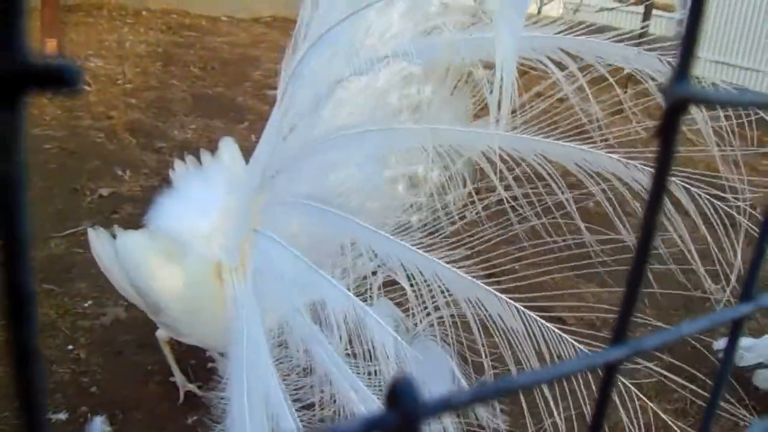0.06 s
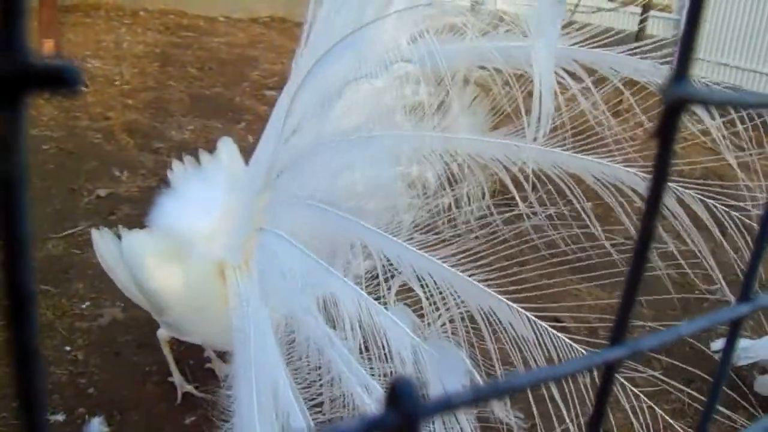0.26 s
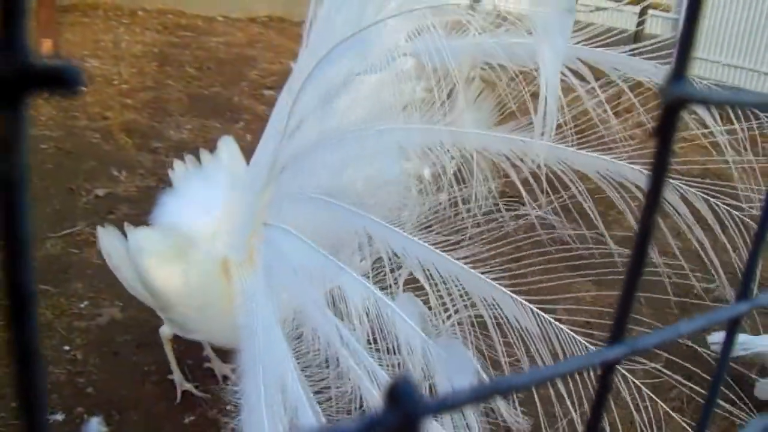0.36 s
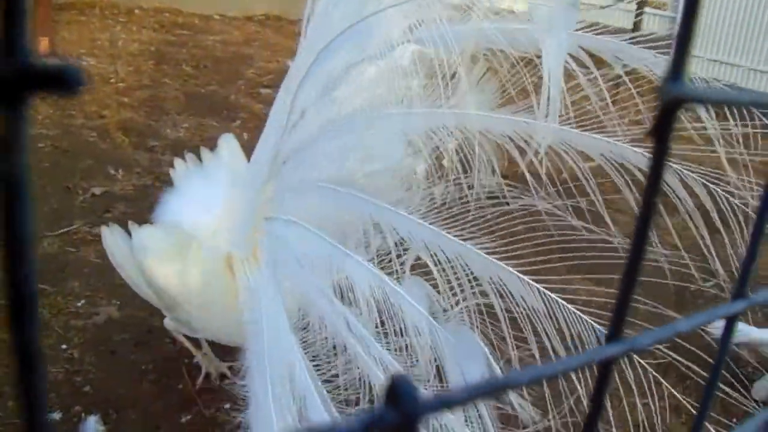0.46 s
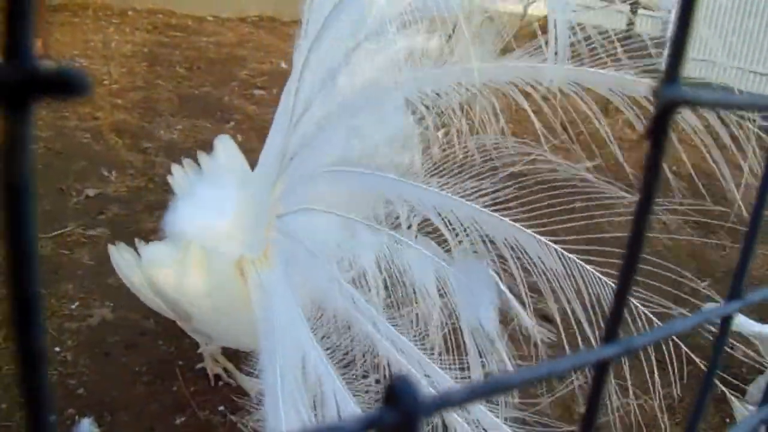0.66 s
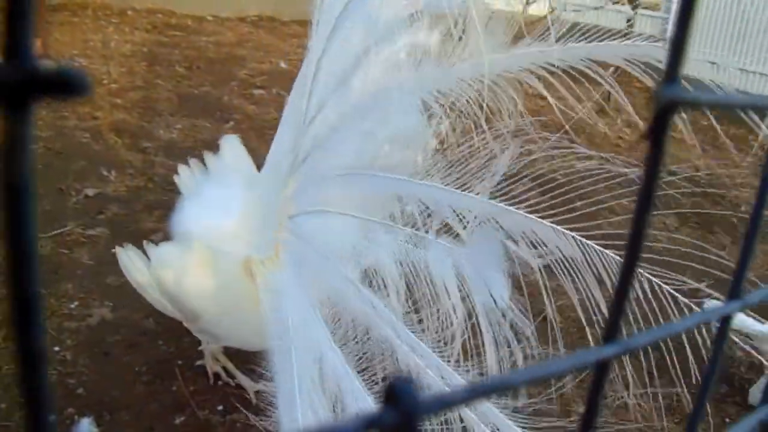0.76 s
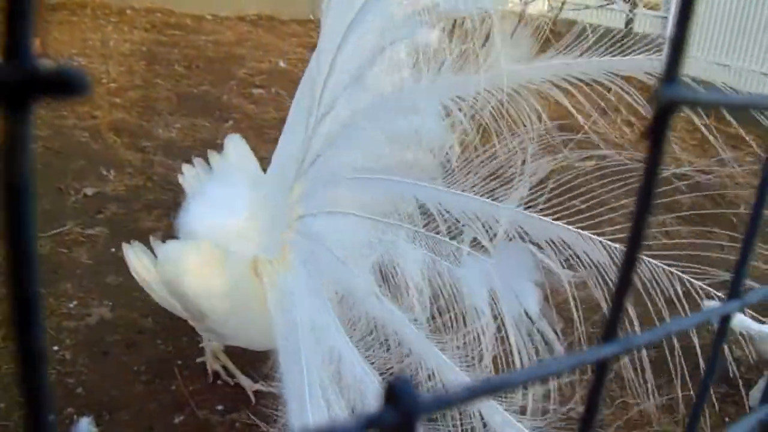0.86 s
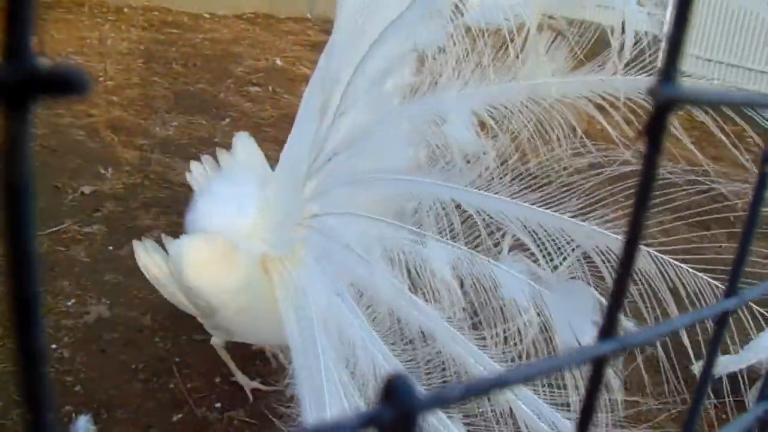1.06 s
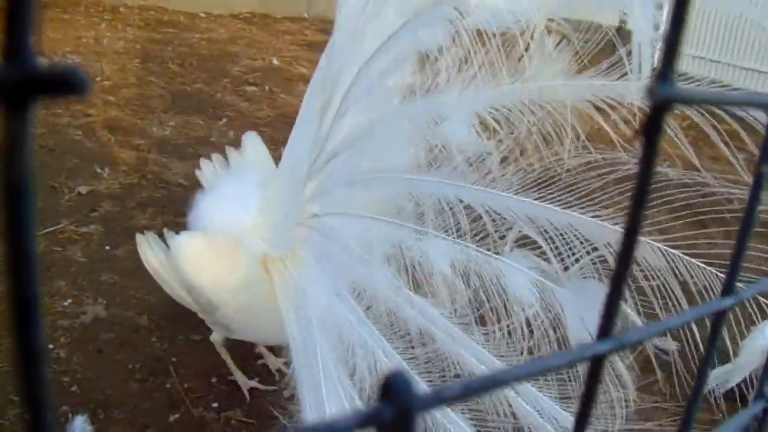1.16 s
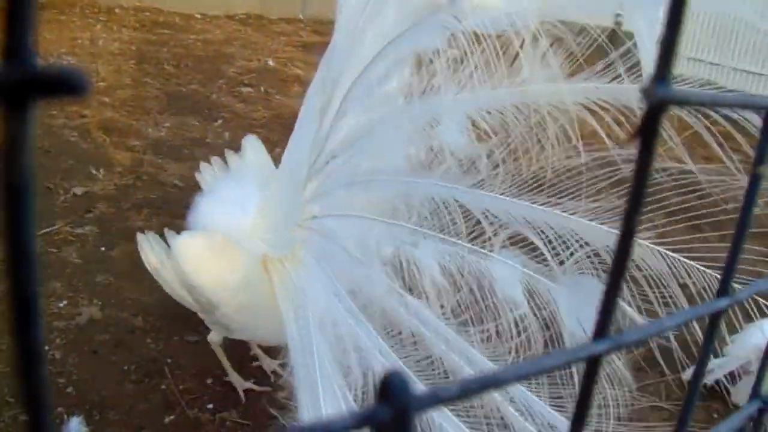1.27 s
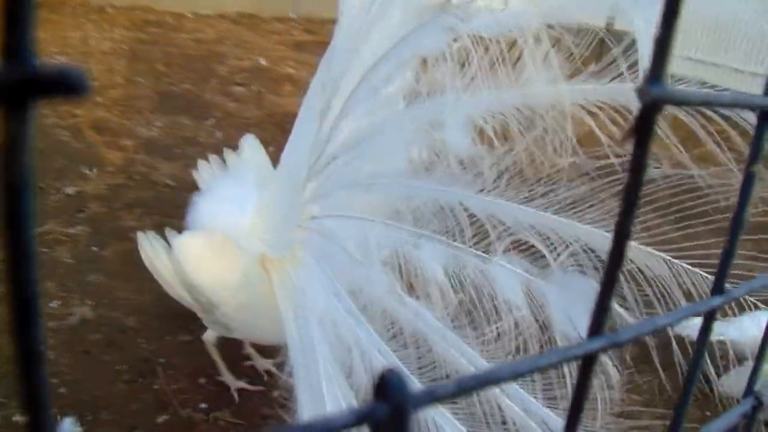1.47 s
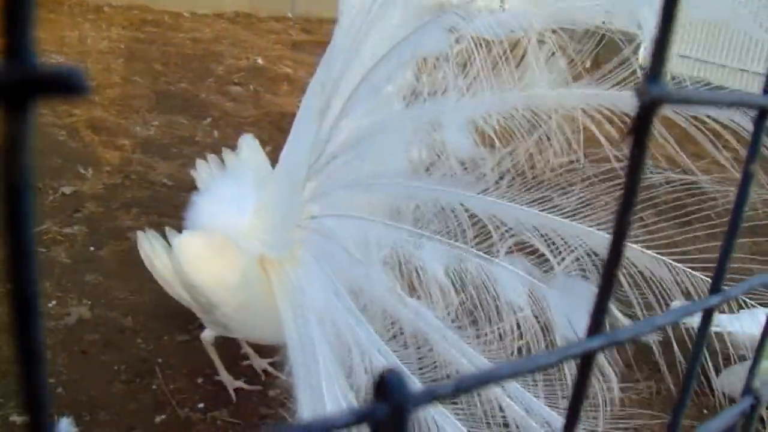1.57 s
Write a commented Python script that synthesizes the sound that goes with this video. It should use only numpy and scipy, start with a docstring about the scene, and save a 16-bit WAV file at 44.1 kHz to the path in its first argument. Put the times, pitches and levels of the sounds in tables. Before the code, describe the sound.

Harsh bird calls, probably parrots, echo in an aviary: a hoarse growl swells into a loud squawk, then two shrill screeches follow. Close to the microphone, a peacock shivers its train in soft pats, and something ticks once.

```python
"""In an echoing aviary, birds, probably parrots, call: a hoarse growl swells into a loud squawk and two
shrill screeches follow, the first level, the second rising, with softer calls before and after.
The calls are harmonics and noise shaped by the throat's resonances. Close by, a displaying peacock
shivers its train in a run of soft pats, and something gives one sharp tick.
A low hum and faint hiss lie underneath."""
import sys
import numpy as np
from scipy import signal
from scipy.fft import rfft, irfft, next_fast_len
from scipy.io import wavfile
from scipy.ndimage import uniform_filter1d

SR = 44100
rng = np.random.default_rng(int(sys.argv[2]) if len(sys.argv) > 2 else 0)


def transcribe(u):
    """Save the signal u as a 16-bit wav file named by the first command-line argument.

    u: samples, shape (n,) or (channels, n), limited to [-1, 1]; the rate is SR.
    q: integer samples, one column per channel.
    """
    v = np.clip(np.atleast_2d(u).T, -1, 1)
    q = np.round(v * 32767).astype(np.int16)
    wavfile.write(sys.argv[1], SR, q)


N = 70560
LEAD = SR // 5  # samples before t = 0, so that the echo has already built up
TIME = np.arange(-LEAD, N) / SR


# Contour of the squawk: t/s, f/Hz, level/dB (levels in all tables are relative)
SQUAWK = [(.412, 850.4, -30), (.435, 944.7, -17), (.465, 984.9, -16), (.495, 892.8, -15),
          (.525, 905.8, -16.5), (.55, 837.7, -18), (.6, 820, -20), (.65, 820.4, -22.5), (.7, 809, -31)]
# Throat response: f/Hz, level/dB
SQUAWK_THROAT = [(150, -51), (250, -38.5), (407, -38), (543, -19), (710, -31), (1050, -7), (1540, -0.5),
                 (1680, -6), (2160, -6.5), (2690, -9.5), (2920, -8.5), (3700, -8.5), (4850, -13.5),
                 (5540, -15), (7510, -26), (10200, -26.5), (14000, -33)]
# Treble gain as the beak opens: t/s, level/dB
BEAK_TREBLE = [(.41, -4), (.47, -2.5), (.53, -2.5), (.58, 0.5), (.7, 2)]

def squawk(crossover_hz=2460):
    """Time-varying filtering: the loudest call brightens as the beak opens."""
    voice = call(SQUAWK, SQUAWK_THROAT, "squawk")
    body = signal.sosfiltfilt(signal.butter(2, crossover_hz, fs=SR, output="sos"), voice)
    treble = voice - body
    return body + treble * from_db(np.interp(TIME, *np.transpose(BEAK_TREBLE)))


# Contour of the growl: t/s, f/Hz, level/dB
GROWL = [(.185, 640, -36.5), (.225, 680, -28), (.275, 700, -25.5), (.35, 720, -26), (.415, 760, -23)]
# Throat response: f/Hz, level/dB
GROWL_THROAT = [(180, -68), (300, -26.5), (336, -43), (434, -27.5), (589, -34), (649, -20), (1320, -4),
                (1820, -3.5), (2470, -10), (3930, -13.5), (4260, -17.5), (6470, -23), (14000, -43)]

def growl():
    """Aperiodic excitation: a voice that is nearly all noise sounds hoarse."""
    return call(GROWL, GROWL_THROAT, "growl")


# Noise share of each voice's power (0-1)
RASP = dict(opening=.5, soft=.6, growl=0.95, squawk=0.76, low=.5, closing=0.46)
# Pitch jitter of each voice, as a fraction of the fundamental
JITTER = dict(opening=0.014, soft=0.014, growl=0.061, squawk=0.0304, first=.012, second=0.0116, low=0.0305, closing=0.019)

def call(contour, throat, name):
    """Source-filter principle: the throat colours harmonics and noise pulsed once per cycle."""
    hz, phase, envelope = modulation(contour, JITTER[name], throb_db=1.2)
    tone = sum(from_db(at_hz(throat, k * hz)) * np.sin(k * phase + rng.uniform(0, 2 * np.pi))
               for k in range(1, 19))
    tone /= np.sqrt(uniform_filter1d(tone ** 2, size=600) + 1e-12)  # hold at unit power
    rasp = unit_rms(coloured(noise() * (1 + np.cos(phase)), throat))
    return envelope * (np.sqrt(1 - RASP[name]) * tone + np.sqrt(RASP[name]) * rasp)


def modulation(contour, jitter, throb_db, edge_s=0.008):
    """Frequency and amplitude modulation: a voice jitters and throbs about its contour."""
    times, pitches, levels = np.transpose(contour)
    hz = np.interp(TIME, times, pitches)
    phase = 2 * np.pi * np.cumsum(hz * (1 + jitter * drift(350))) / SR
    gate = np.clip(np.minimum(TIME - times[0], times[-1] - TIME) / edge_s + 1, 0, 1)
    envelope = gate * from_db(np.interp(TIME, times, levels) + throb_db * drift(70))
    return hz, phase, envelope


# Contours of the screeches: t/s, f/Hz, level/dB
FIRST_SCREECH = [(.808, 762.4, -39), (.838, 747, -33), (.872, 776, -26.5), (.91, 769, -30), (.96, 753, -31),
                 (.985, 743, -44)]
SECOND_SCREECH = [(1.086, 669.3, -36), (1.1, 697, -33), (1.108, 752.6, -31), (1.122, 824, -29),
                  (1.15, 844, -28), (1.185, 855, -23), (1.215, 855.4, -35), (1.236, 856, -20),
                  (1.248, 850, -33)]
# Their line spectra: harmonic number, level/dB
FIRST_OVERTONES = [(2, -20), (4, -30), (5, -7), (6, -0.5), (7, -4), (8, -10.5), (10, -19), (12, -14),
                   (15, -37), (18, -26)]
SECOND_OVERTONES = [(2, -19.5), (3, -21), (4, -20), (5, 0.5), (6, -1), (7, -15), (8, -19), (9, -18.5),
                    (10, -6.5), (11, -16.5), (12, -20.5), (14, -32), (15, -22.5), (17, -31)]

def screeches():
    """Missing fundamental: two shrill calls carry most of their power near the sixth harmonic."""
    return (screech(FIRST_SCREECH, FIRST_OVERTONES, JITTER["first"])
            + screech(SECOND_SCREECH, SECOND_OVERTONES, JITTER["second"]))


def screech(contour, overtones, jitter, rasp=0.22, wobble=0.01098, flicker_db=4.5):
    """Spectral broadening: random modulation frays each overtone into a narrow band of rasp."""
    hz, phase, envelope = modulation(contour, jitter, throb_db=2.4)
    phase += 2 * np.pi * np.cumsum(hz * wobble * drift(113.8)) / SR
    voice = 0
    for k in range(2, 19):
        fray = np.sqrt(1 - rasp) + np.sqrt(rasp / 2) * (drift(325) + 1j * drift(325))
        gain = from_db(np.interp(k, *np.transpose(overtones)) + flicker_db * drift(70))
        carrier = np.exp(1j * (k * phase + rng.uniform(0, 2 * np.pi)))
        voice += gain * np.real(fray * carrier)
    return envelope * unit_rms(voice)


# Clear notes within the calls, one contour each: t/s, f/Hz, level/dB
WHISTLES = [
    [(0, 3360, -36.5), (.02, 3410, -37.5), (.05, 3390, -36), (.07, 3500, -61)],
    [(.14, 2730, -44), (.19, 2710, -33.5), (.22, 2656, -42)],
    [(.414, 1680, -19.5), (.433, 1886, -19), (.448, 1891, -29), (.465, 2058, -25), (.48, 1890, -21.5),
     (.495, 1783, -20.5), (.52, 1795, -17.5), (.54, 1776, -21), (.555, 1570, -26)],
    [(.812, 4640, -33), (.84, 4460, -28.5), (.875, 4633, -39), (.915, 4585, -30)],
    [(1.087, 3262, -39), (1.098, 3476, -33), (1.108, 3850, -47), (1.13, 3960, -47)],
    [(1.4135, 2130, -31.5), (1.424, 2090, -44.5), (1.436, 2140, -46)],
]

def whistles():
    """Nearly simple harmonic motion: each note is one gliding sinusoid."""
    notes = 0
    for contour in WHISTLES:
        _, phase, envelope = modulation(contour, jitter=0.012, throb_db=2.2, edge_s=0.0028)
        notes += np.sqrt(2) * envelope * np.sin(phase)
    return notes


# Contours of the softer calls: t/s, f/Hz, level/dB
OPENING_CALL = [(-.12, 854, -26.5), (0, 845, -33.5), (.035, 844, -45.5), (.06, 843, -40)]
SOFT_CALL = [(.04, 785.4, -37.5), (.1, 727, -38.5), (.15, 691.4, -36), (.19, 677, -35), (.23, 705, -63)]
FALLING_CALL = [(.76, 884.3, -30.5), (.86, 830, -32.5), (.93, 790.5, -28.5), (.98, 760, -38),
                (1.04, 667.5, -35.5), (1.06, 624, -42)]
CLOSING_CALL = [(1.432, 762.3, -42), (1.45, 769, -41.5), (1.5, 753.7, -37.5), (1.55, 731.4, -34),
                (1.6, 694, -36.5)]
# Their throat responses: f/Hz, level/dB
OPENING_THROAT = [(800, -25), (1650, -9), (2400, -9.5), (3370, 1.5), (4250, -4), (5100, -1), (6200, -14),
                  (7700, -11), (10000, -16), (14000, -28)]
SOFT_THROAT = [(700, -36), (1400, -10.5), (2150, 2.5), (2750, -5.5), (3500, -10), (4800, -13), (6700, -12),
               (8000, -28), (14000, -22)]
FALLING_THROAT = [(500, -20.5), (850, -16), (1200, -8.5), (1700, -6), (2400, -1), (3300, -12.5),
                  (5000, -6.5), (14000, -35)]
CLOSING_THROAT = [(400, -41), (750, -13.5), (1050, -15), (1500, -7), (2200, -3.5), (2900, -8.5), (3700, -6),
                  (5200, -16), (6800, -15.5), (9000, -26.5), (14000, -37)]

def softer_calls():
    """Formants: different throat resonances give four half-noisy calls their own timbres."""
    return (call(OPENING_CALL, OPENING_THROAT, "opening")
            + call(SOFT_CALL, SOFT_THROAT, "soft")
            + call(FALLING_CALL, FALLING_THROAT, "low")
            + call(CLOSING_CALL, CLOSING_THROAT, "closing"))


def birds():
    """Direct-to-reverberant ratio: the screeching bird is nearer, so more of its sound is direct."""
    far = squawk() + growl() + whistles() + softer_calls()
    near = screeches()
    direct = from_db(-3.5) * far + from_db(-2.5) * near
    return direct + aviary(from_db(-3.5) * far + from_db(-4) * near)


# Pats of the peacock's train: t/s, level/dB
PATS = [(.883, -30.5), (.914, -34.5), (.949, -36), (.981, -34.5), (1.019, -35.5), (1.081, -29.5),
        (1.114, -30), (1.149, -29), (1.181, -31), (1.216, -30), (1.247, -30.5), (1.287, -31.5),
        (1.323, -32.5), (1.352, -34), (1.385, -35), (1.418, -33), (1.452, -35.5), (1.48, -37), (1.581, -38)]

def train_shiver(start_hz=560, rise_hz_per_s=111000, peak_s=0.0018, bounce_s=0.00331):
    """Transients with reflection: each pat is a few rising cycles, repeated off the ground."""
    pats = 0
    for onset, db in PATS:
        t = np.maximum(TIME - onset, 0)
        swell = (t / peak_s * np.exp(1 - t / peak_s)) ** 2
        hz = start_hz * (1 + 0.05 * rng.standard_normal())
        cycles = hz * t + rise_hz_per_s * t ** 2 / 2 + rng.random()
        pats += from_db(db + 0.5) * swell * np.sin(2 * np.pi * cycles)
    ground_bounce = np.interp(TIME - bounce_s, TIME, pats)
    return pats + from_db(-7) * ground_bounce + from_db(-8.5) * aviary(pats)


# Snaps within the tick: t/s, level/dB
TICK_SNAPS = [(1.3151, 5.5), (1.3155, -4), (1.3166, 6.5)]
# Their spectrum: f/Hz, level/dB
TICK_COLOUR = [(100, -16), (1000, -9), (3000, -12), (5500, -1.5), (8000, -7), (11000, 0), (12500, -12),
               (13500, 1), (14300, 1)]

def tick(decay_s=0.0012):
    """Temporal fusion: three impulses within 1.5 ms, each with a noisy tail, make one bright tick."""
    snaps = np.zeros(len(TIME))
    for onset, db in TICK_SNAPS:
        decay = (TIME >= onset) * np.exp(-np.abs(TIME - onset) / decay_s)
        snaps += from_db(db - 13) * noise() * decay
        snaps[LEAD + int(onset * SR)] += from_db(db)
    return coloured(snaps, TICK_COLOUR)


# Reverberation time of the aviary: f/Hz, T60/s
AVIARY_T60 = [(500, 0.62), (1500, 0.77), (4500, 0.59), (9000, 0.37), (14000, 0.32)]

def aviary(sound, delay_s=0.0092):
    """Reverberation: a diffuse field decays exponentially, fastest in the treble."""
    t = np.arange(SR) / SR
    edges_hz = np.geomspace(150, 16000, 10)
    tail = 0
    for low, high in zip(edges_hz, edges_hz[1:]):
        bandpass = signal.butter(2, [low, high], "band", fs=SR, output="sos")
        t60 = at_hz(AVIARY_T60, np.sqrt(low * high))
        tail += signal.sosfilt(bandpass, rng.standard_normal(SR)) * from_db(-60 * t / t60)
    tail *= t > delay_s
    return signal.fftconvolve(sound, tail / np.sqrt(2 * np.sum(tail ** 2)))[:len(sound)]


# Spectral density of the outdoor hiss: f/Hz, level/dB
HISS_SPECTRUM = [(20, -2), (42, -11.5), (100, -4.5), (160, -8.5), (280, -14.5), (600, -12), (1500, -11.5),
                 (4000, -30.5), (8000, -24), (14000, -28.5)]

def background(hum_hz=65.5, hum_db=-51, hiss_db=-49):
    """Noise floor: faint broadband hiss and a low hum that wavers in phase and level."""
    hum = np.sqrt(2) * np.sin(2 * np.pi * hum_hz * TIME + 0.3 * drift(17))
    hiss = unit_rms(coloured(noise(), HISS_SPECTRUM))
    return from_db(hiss_db) * hiss + from_db(hum_db + 3 * drift(12.3)) * hum


def from_db(db):
    """Amplitude ratio of a level in decibels."""
    return 10 ** (np.asarray(db) / 20)


def unit_rms(x):
    """Normalisation to unit power."""
    return x / np.sqrt(np.mean(x ** 2) + 1e-20)


def at_hz(table, hz):
    """Interpolation on a logarithmic frequency axis."""
    freqs, values = np.transpose(table)
    return np.interp(np.log(np.maximum(hz, 1)), np.log(freqs), values)


def coloured(x, spectrum):
    """Linear filtering by multiplication of spectra."""
    size = next_fast_len(len(x) + LEAD)
    gain = from_db(at_hz(spectrum, np.fft.rfftfreq(size, 1 / SR)))
    return irfft(rfft(x, size) * gain, size)[:len(x)]


def noise():
    """White noise: equal power per hertz."""
    return rng.standard_normal(len(TIME))


def drift(bandwidth_hz):
    """Random fluctuation: low-passed noise of unit power."""
    return unit_rms(signal.sosfilt(signal.butter(2, bandwidth_hz, fs=SR, output="sos"), noise()))


def scene():
    """Superposition: all sources add at one point, alike in both channels."""
    mono = (birds() + train_shiver() + tick() + background())[LEAD:]
    return np.array([mono, mono])


def record(dry, cutoff_hz=14250):
    """Band limiting: a steep low-pass filter removes the highest treble."""
    lowpass = signal.firwin(301, cutoff_hz, window="blackman", fs=SR)
    return signal.fftconvolve(dry, lowpass[None], mode="same", axes=1)


dry = scene()
out = record(dry)
transcribe(out)
```